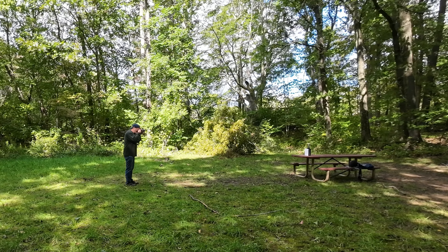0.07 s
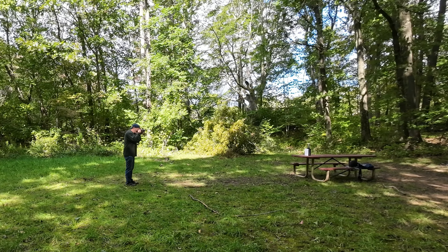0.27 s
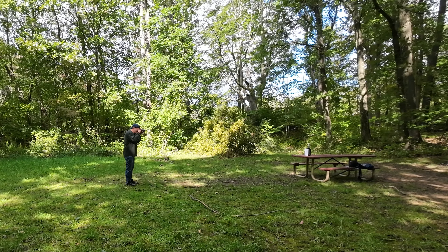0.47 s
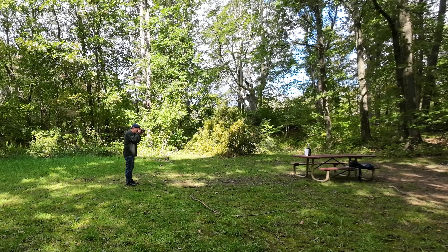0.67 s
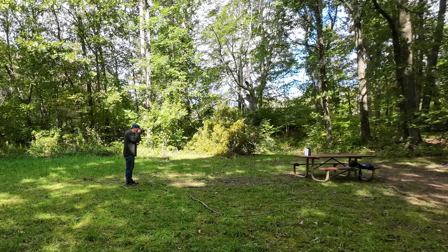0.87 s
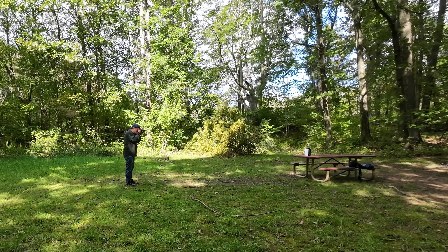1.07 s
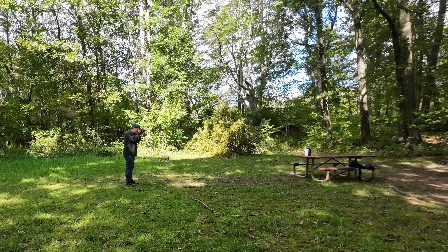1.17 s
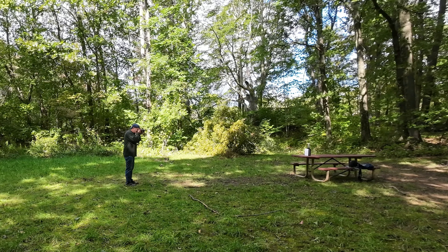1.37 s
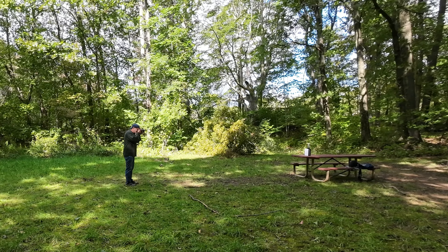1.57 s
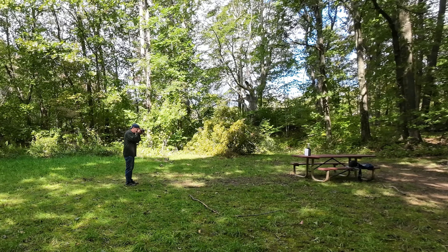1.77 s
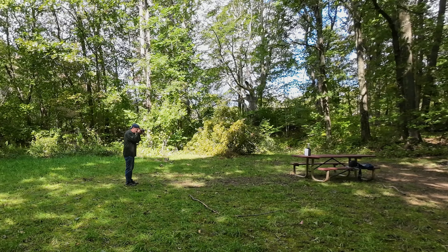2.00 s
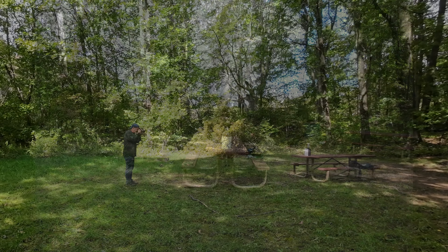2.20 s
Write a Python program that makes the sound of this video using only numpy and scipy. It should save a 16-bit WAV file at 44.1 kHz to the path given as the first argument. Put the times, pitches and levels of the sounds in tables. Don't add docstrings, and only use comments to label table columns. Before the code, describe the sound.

Single camera shutter clack with mirror slap and short rewind rattle, over very faint leaf hush

```python
import sys
import numpy as np
from scipy import signal
from scipy.fft import rfft, irfft, next_fast_len
from scipy.io import wavfile
from scipy.ndimage import uniform_filter1d, map_coordinates

SR = 44100
rng = np.random.default_rng(int(sys.argv[2]) if len(sys.argv) > 2 else 0)


def gain_from_db(level_db):
    decades = np.asarray(level_db, float) / 20
    return 10 ** decades


def wav_out(sig):
    wavfile.write(sys.argv[1], SR, np.round(np.clip(np.atleast_2d(sig).T, -1, 1) * 32767).astype(np.int16))


N = 98695


def unit(x):
    return x / np.sqrt(np.mean(x ** 2) + 1e-20)


def along(points, hz):
    f, value = np.transpose(points)
    return np.interp(np.log(hz + 1), np.log(f + 1), value)


def filtered(x, response):
    size = next_fast_len(N + SR // 2)
    hz = np.fft.rfftfreq(size, 1 / SR)
    return irfft(rfft(x, size) * response(hz), size)[..., :N]


def wobble(rate):
    knots = rng.standard_normal(int(N * rate / SR) + 4)
    return map_coordinates(knots, [np.arange(N) * rate / SR])


# f/Hz, level/dB per Hz
LEAF_SPECTRUM = [(25, -6), (50, -15), (80, 0.5), (500, 1), (1300, -4.5), (2500, -12), (4600, -16),
                 (6500, -27.5)]
# t/s, level/dB, f/Hz
FAR_BUMPS = [
    (0.234, -63, 2510),
    (2.119, -53, 354),
    (2.13, -55, 200),
]
LEAVES_DB, BUMP_T60_S = -68.5, 0.019


def leaves():
    spectrum = [*LEAF_SPECTRUM, (10000, -34), (16000, -50)]
    hush = unit(filtered(rng.standard_normal(N), lambda hz: gain_from_db(along(spectrum, hz))))
    hush = hush * gain_from_db(LEAVES_DB + 0.33 * wobble(1.8) + 0.6 * wobble(25.57))
    t = np.arange(SR // 10) / SR
    for start, db, hz in FAR_BUMPS:
        bump = gain_from_db(db - 60 * t / BUMP_T60_S) * np.sin(2 * np.pi * hz * t)
        hush[round(start * SR):][:len(t)] += bump
    return hush


# f/Hz, level/dB per Hz
HISS_SPECTRUM = [(300, 1), (5000, -6), (11000, -0.5), (15500, -1.5)]
HISS_DB, TOP_HZ = -91, 15780


def preamp_hiss(shape):
    noise = rng.standard_normal(shape)
    return gain_from_db(HISS_DB) * unit(filtered(noise, lambda hz: gain_from_db(along(HISS_SPECTRUM, hz)) * (hz < TOP_HZ)))


# t/s, level/dB
GEAR_TRAVEL = [(1.537, -74), (1.544, -60), (1.561, -47.5), (1.602, -44.5), (1.609, -53.5), (1.635, -48.5),
               (1.66, -38.5), (1.691, -49), (1.695, -70)]
# f/Hz, level/dB per Hz
RATTLE_SPECTRUM = [(300, -19.5), (750, -2), (1250, -8), (1800, -11), (2600, 2), (4000, -7.5), (6000, -14.5),
                   (15500, -20.5)]
# f/Hz, width/Hz, level/dB
GEAR_WHINE = [(2920, 124, 2), (5810, 120, 6.5), (7800, 190, 4.5)]
TEETH_PER_S, TOOTH_SPREAD_DB, TOOTH_T60_S = 3500, 3, 0.0087
FADE_DB_PER_S = 500


def gear_response(hz):
    whine = 1
    for centre, width, db in GEAR_WHINE:
        whine = whine + gain_from_db(db) / (1 + ((hz - centre) / width) ** 2)
    return gain_from_db(along([(200, -60), *RATTLE_SPECTRUM], hz)) * whine


def gears():
    contacts = rng.random(N) < TEETH_PER_S / SR
    teeth = contacts * gain_from_db(TOOTH_SPREAD_DB * rng.standard_normal(N))
    decay = gain_from_db(-60 / (TOOTH_T60_S * SR))
    grain = signal.lfilter([1], [1, -decay], teeth) * rng.standard_normal(N)
    t = np.arange(N) / SR
    times, levels = np.transpose(GEAR_TRAVEL)
    db = np.interp(t, times, levels, left=-140) - FADE_DB_PER_S * np.maximum(t - times[-1], 0)
    return unit(filtered(grain, gear_response)) * gain_from_db(db)


DETUNE, SCATTER_DB = 0.013, 2
RISE_S, CRACK_DB = 0.00071, -6


def ring(modes, t60, t):
    hz, db = np.transpose(modes)[:, :, None]
    weight, detune, phase = rng.standard_normal((3, len(modes), 1))
    partials = gain_from_db(db + SCATTER_DB * weight) * np.sin(2 * np.pi * hz * (1 + DETUNE * detune) * t + 2 * phase)
    crack = unit(uniform_filter1d(rng.standard_normal(len(t)), size=30))
    envelope = gain_from_db(-60 * t / t60) * (1 - np.exp(-(t / RISE_S) ** 2))
    return unit(partials.sum(0)) * (1 + gain_from_db(CRACK_DB) * crack) * envelope


# t/s, level/dB, f/Hz
LATCH_TICKS = [(1.5385, -64, 13500), (1.5515, -42.5, 14650), (1.5518, -41.5, 11250), (1.5993, -35.5, 13220),
               (1.5995, -46, 10700), (1.6145, -40, 14600), (1.6195, -47, 14500), (1.640, -43, 13000),
               (1.658, -49, 14900), (1.687, -48, 10840)]
TICK_T60_S = 0.011


def latches():
    out, t = np.zeros(N), np.arange(SR // 10) / SR
    for start, db, hz in LATCH_TICKS:
        modes = [(hz, 0), (0.93 * hz, -8), (1.4 * hz, -8)]
        out[round(start * SR):][:len(t)] += gain_from_db(db) * ring(modes, TICK_T60_S, t)
    return out


# t/s, shell level/dB, mirror box level/dB, blade level/dB, shell t60/s
CONTACTS = [(1.5433, -44, -54.5, -58, 0.018), (1.5538, -24.5, -50, -29.5, .014),
            (1.558, -35, -55, -60, 0.0097), (1.561, -43.5, -47.5, -42, .014),
            (1.5648, -36, -43.5, -40, 0.013), (1.5945, -48, -42, -46, 0.014), (1.602, -28, -44, -40, 0.014),
            (1.6092, -44, -57, -60, 0.014), (1.6162, -25.5, -40, -31.5, 0.017),
            (1.6217, -26, -32, -29, 0.02), (1.6265, -28, -28, -52, 0.0067),
            (1.6399, -29.5, -41, -43, 0.011), (1.6431, -25, -40.5, -31, 0.013),
            (1.653, -28.5, -51, -45, 0.016), (1.657, -32, -52, -35, 0.013), (1.6614, -32, -37, -49, 0.013),
            (1.671, -47, -34.5, -44, 0.014), (1.675, -27.5, -42.5, -35, 0.016),
            (1.6795, -40, -42, -39.5, 0.018), (1.6845, -35.5, -42.5, -46, 0.024),
            (1.6892, -36, -39.5, -36, 0.0061)]
# f/Hz, level/dB
SHELL_MODES = [(2300, -3.5), (2510, 3.5), (2750, -3), (3350, 1), (3750, -1.5), (4700, -6)]
# f/Hz, level/dB
BOX_MODES = [(430, -14), (624, -6.5), (800, -5.5), (1250, 7), (1750, -21)]
# f/Hz, level/dB
BLADE_MODES = [(5600, 0.5), (6750, -1.5), (7800, 1.5), (8750, 1), (9800, -8), (11000, -3.5), (12100, -2),
               (13400, -17), (14500, -12)]
BOX_LONGER, BLADES_LONGER = 2.05, 0.78


def blows():
    out, t = np.zeros(N), np.arange(SR // 10) / SR
    for start, shell_db, box_db, blade_db, t60 in CONTACTS:
        shell = gain_from_db(shell_db) * ring(SHELL_MODES, t60, t)
        box = gain_from_db(box_db) * ring(BOX_MODES, BOX_LONGER * t60, t)
        blades = gain_from_db(blade_db) * ring(BLADE_MODES, BLADES_LONGER * t60, t)
        out[round(start * SR):][:len(t)] += shell + box + blades
    return out


# f/Hz, t60/s
TRUNK_DECAY = [(300, .25), (3000, 0.12), (12000, 0.027)]
TREES_DB = -19.5


def trees(x):
    hz, t, z = signal.stft(rng.standard_normal(SR // 3), SR, nperseg=256)
    decay = gain_from_db(-60 * t / along(TRUNK_DECAY, hz)[:, None])
    tail = signal.istft(z * decay, SR, nperseg=256)[1]
    return gain_from_db(TREES_DB) * signal.fftconvolve(x, tail / np.linalg.norm(tail))[:N]


# f/Hz, strength/0-1
ECHO_STRENGTH = [(100, 0.4), (1000, 0.83), (2000, 0.54), (7000, 0.92), (10000, 1), (12000, 0.7),
                 (15000, 0.2)]
ECHO_S = 43 / 44100
FEEDBACK = 0.67


def comb(hz):
    echo = along(ECHO_STRENGTH, hz) * np.exp(-2j * np.pi * hz * ECHO_S)
    return (1 - echo) / (1 - FEEDBACK * echo)


def scene():
    camera = gears() + latches() + blows()
    camera = filtered(camera, lambda hz: 1 / (1 + (340 / (hz + 1)) ** 8))
    return (camera + trees(camera) + leaves())[None]


def band_limit(x):
    return signal.sosfilt(signal.butter(12, 16330, fs=SR, output="sos"), x)


def record(dry):
    sound = filtered(dry, lambda hz: comb(hz) / (1 + (hz / TOP_HZ) ** 80))
    return band_limit(sound + preamp_hiss(dry.shape))


dry = scene()
out = record(dry)
wav_out(out)
```